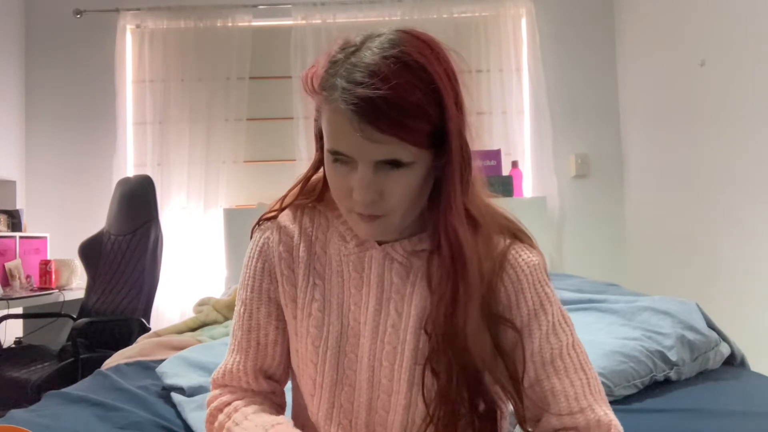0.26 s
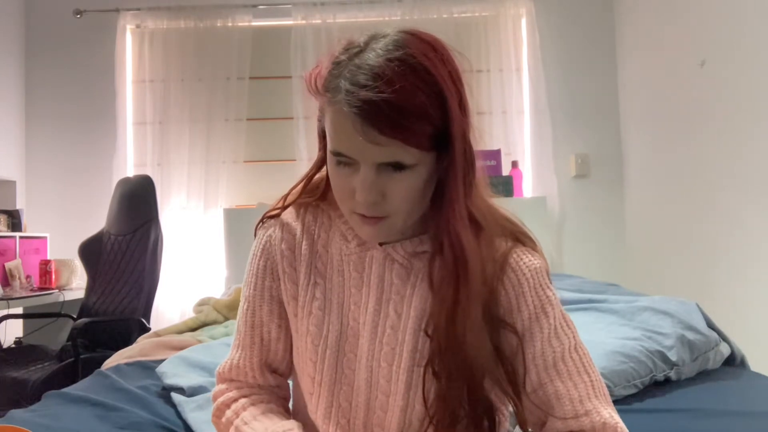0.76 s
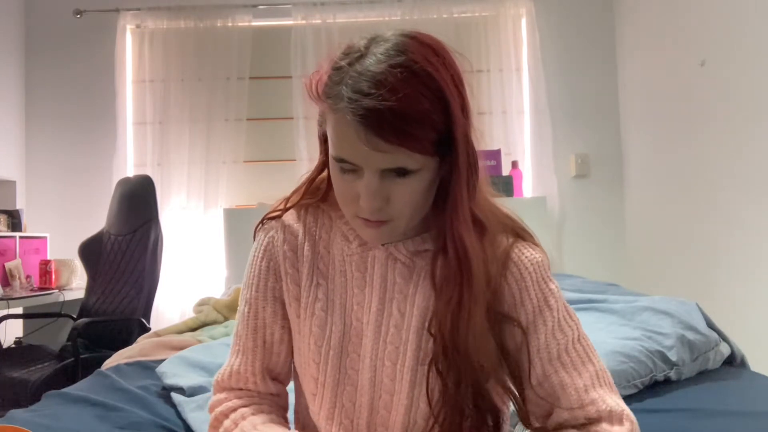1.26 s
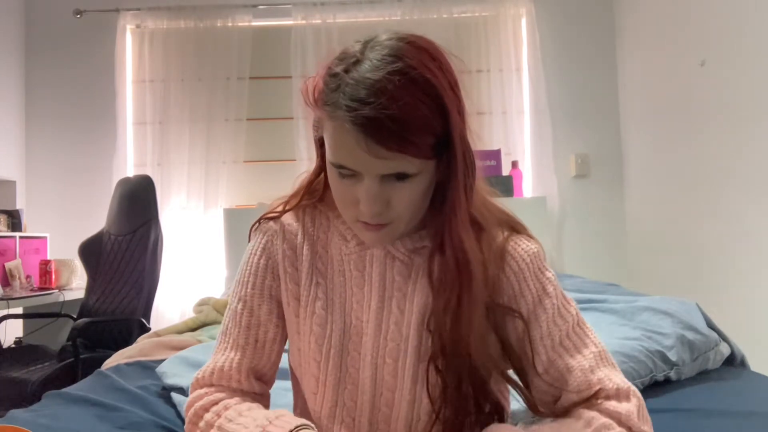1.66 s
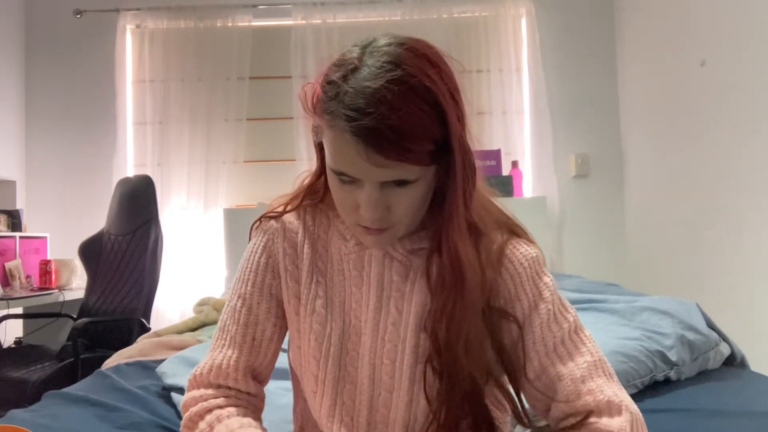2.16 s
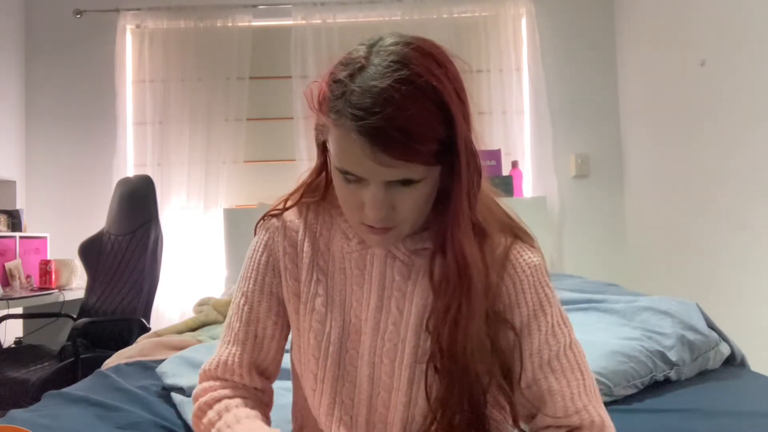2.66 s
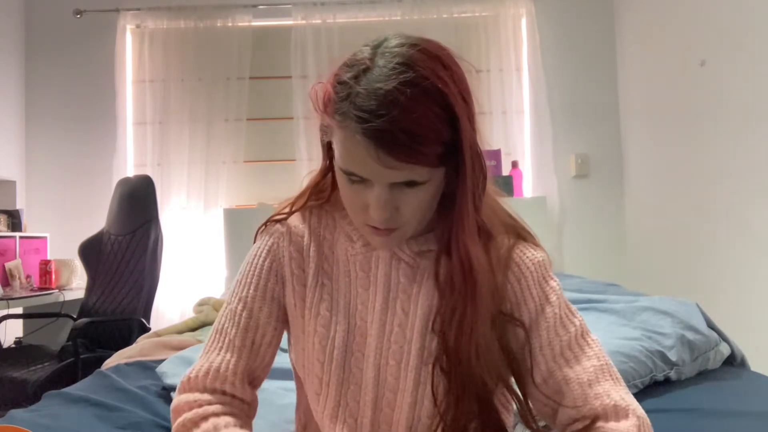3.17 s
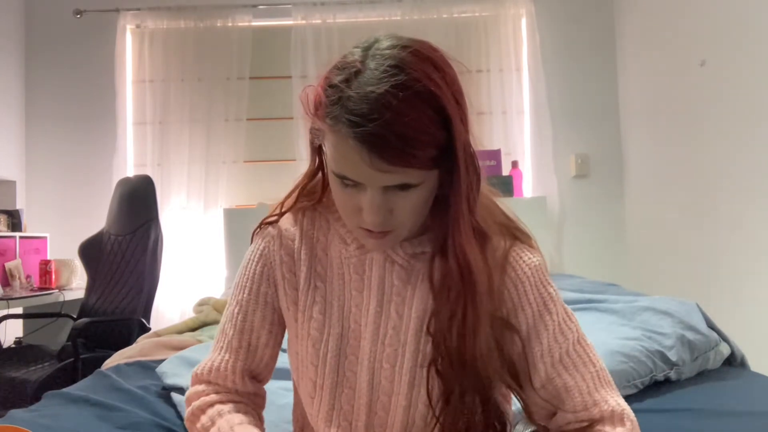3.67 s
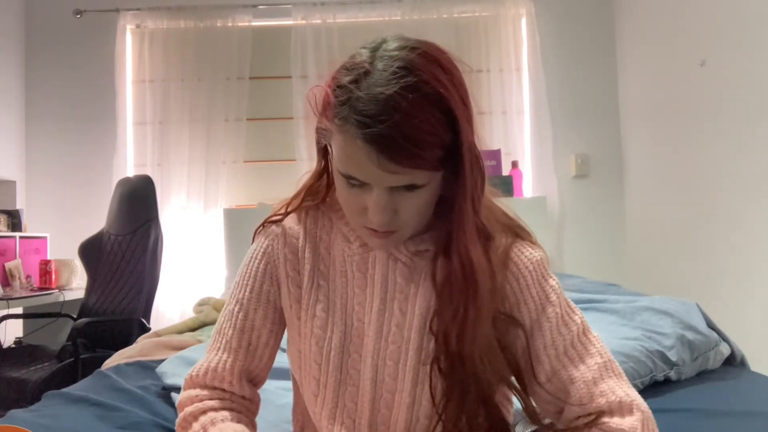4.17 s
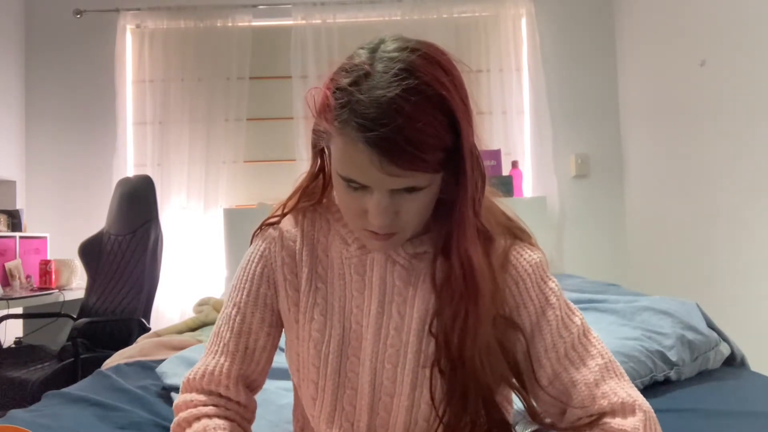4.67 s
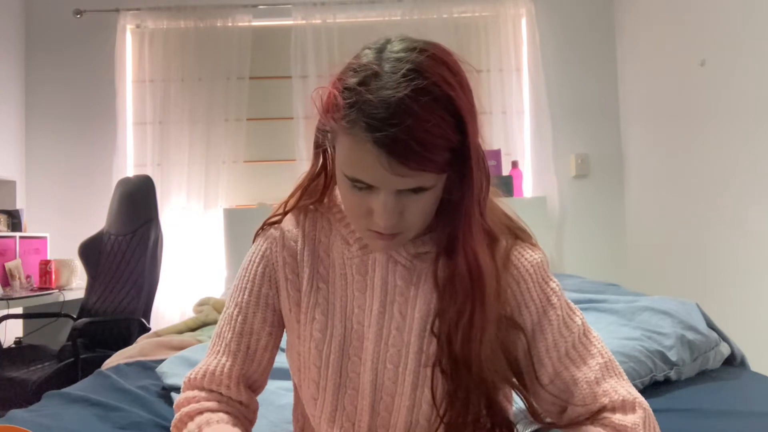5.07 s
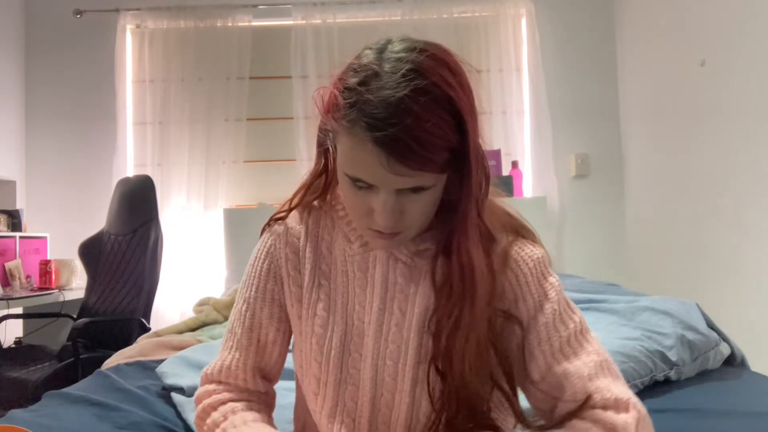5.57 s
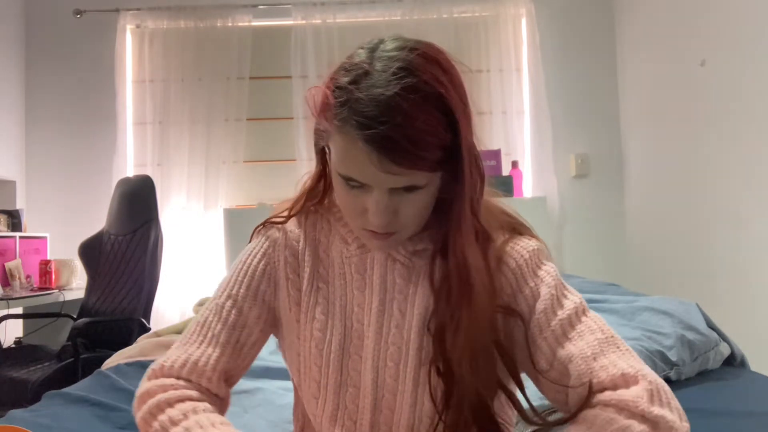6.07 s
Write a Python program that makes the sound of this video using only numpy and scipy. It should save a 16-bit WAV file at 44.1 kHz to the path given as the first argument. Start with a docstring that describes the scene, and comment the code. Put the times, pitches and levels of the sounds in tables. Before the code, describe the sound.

In a small bedroom, hands turn and open a stiff plastic sweet packet on a bed, close to the microphone. From 0 s there are scattered snaps and tiny crackles, with a sharper cluster around 0.4-0.6 s and a bright crack near 1.05 s. Separate creases continue until about 2 s, then thicken into the loudest dense burst at 2.28-2.5 s, with a low cushioned bump. It eases briefly; from 2.85 to 3.65 s crisp creases crowd together and taut film judders in rapid ticks. From 3.7 to 5 s the crinkling is lighter and uneven, with isolated snaps near 4.36 and 4.66 s. Dull bumps ring softly on the bed at 5.3 s, followed by sparse rustle. Around 6.1 s it intensifies, ending at 6.3 s in a strong flurry with a low thump. Fine film sliding, a short room tail and faint rumble run throughout.

```python
"""A small bedroom: hands turn and open a plastic sweet packet on a bed, just under a two-port microphone.
First come scattered snaps, each a crease that buckles, flaps the film and shakes the bag, over faint room rumble.
Past two seconds they bunch into a loud burst with a low bump; after three they crowd again, and the film judders.
Then they thin out, more bumps ring low on the bed after five seconds, and a strong flurry ends the take.
Throughout, tiny folds crackle and film slides at random; nearby surfaces and walls add a short tail."""
import sys
import numpy as np
from scipy import signal
from scipy.fft import rfft, irfft, next_fast_len
from scipy.io import wavfile

SR = 44100
rng = np.random.default_rng(int(sys.argv[2]) if len(sys.argv) > 2 else 0)


def wav_out(sig):
    """Save sig, one row per channel (or a flat mono array), as 16-bit PCM at SR to the path in sys.argv[1]."""
    wavfile.write(sys.argv[1], SR, np.round(np.clip(np.atleast_2d(sig).T, -1, 1) * 32767).astype(np.int16))


N = 279153
T = np.arange(N) / SR
BURST = 1536  # samples in one short film or bag sound
SIDES = np.array([[1], [-1]])  # left port, right port


def undb(db):
    """Decibels to gain."""
    return 10 ** (np.asarray(db) / 20)


def unit(x):
    """Scale each row to an energy of one."""
    return x / np.sqrt(np.sum(x ** 2, axis=-1, keepdims=True) + 1e-30)


def level(x, db):
    """Scale each row to an rms level."""
    return unit(x) * np.sqrt(x.shape[-1]) * undb(db)


def along(hz, points, axis=1):
    """Read one column of a table against log frequency."""
    table = np.array(points, float)
    return np.interp(np.log(hz + 1), np.log(table[:, 0]), table[:, axis])


def bins(size):
    """Frequencies of a spectrum of so many samples."""
    return np.fft.rfftfreq(size, 1 / SR)


def colour(x, points):
    """Causal (minimum-phase) filter with the given (Hz, dB) shape."""
    size = next_fast_len(2 * x.shape[-1])
    size += size % 2
    cepstrum = irfft(np.log(undb(along(bins(size), points))))
    # folding the cepstrum onto positive times makes the filter causal
    cepstrum[1:size // 2] *= 2
    cepstrum[size // 2 + 1:] = 0
    filtered = irfft(rfft(x, size) * np.exp(rfft(cepstrum)))
    return filtered[..., :x.shape[-1]]


def shudder(count, decay_s, rise_s=1e-6, size=BURST):
    """Bursts of irregular motion that build up and die away, one a row."""
    t = np.arange(size) / SR
    return rng.standard_normal((count, size)) * np.exp(-t / decay_s) * (1 - np.exp(-t / rise_s))


def resonate(x, hz, q):
    """Each row through its own broad resonance, applied twice for steep skirts."""
    ratio = (bins(x.shape[-1]) + 1) / hz[:, None]
    return irfft(rfft(x) / (1 + 1j * q * (ratio - 1 / ratio)) ** 2)


def place(times, sounds):
    """Lay the rows on the time line."""
    out = np.zeros(N + sounds.shape[1])
    starts = np.clip(times * SR, 0, N - 1).astype(int)
    for start, sound in zip(starts, sounds):
        out[start:start + len(sound)] += sound
    return out[:N]


# Spectral shape of the still air in the room. Each row: frequency in Hz, relative density in dB per Hz.
ROOM_AIR = [(25, -35.5), (40, 0), (55, 2.5), (120, -3.5), (300, -12.5), (1000, -28), (4000, -37),
            (15000, -33)]


def air():
    """Faint room rumble, nearly the same on both sides: shaped noise with a weak side part."""
    mid, side = colour(rng.standard_normal((2, N)), ROOM_AIR)
    return level(mid, db=-73.5) + SIDES * level(side, db=-82.5)


# The bedroom's tail by band. Each row: frequency in Hz, energy against the direct sound in dB,
# time to fall by 60 dB in s, side minus mid in dB.
ROOM_TAIL = [(286, -1.5, 0.37, -7), (420, 0.5, 0.26, -9), (690, 3, 0.3, 5.5), (1080, -4.5, 0.29, 0.5),
             (2810, -1.5, 0.29, 0), (6930, -5, 0.25, 2.5), (9570, -15.5, 0.33, -12.5),
             (11900, -15, 0.18, 18.5), (14000, -19.5, 0.29, -30)]


def bedroom(x, build_s=0.0045, size=22050):
    """A diffuse tail: noise in bands, each with its own fade and its own width between the ports."""
    t, hz = np.arange(size) / SR, bins(size)
    mid, side = rfft(rng.standard_normal((2, size)))
    width = undb(along(hz, ROOM_TAIL, axis=3))
    field = (mid + SIDES * width * side) / np.hypot(1, width)
    response = np.zeros((2, size))
    for own, (_, db, t60, _) in zip(np.eye(len(ROOM_TAIL)), ROOM_TAIL):
        # this band's share of the spectrum, crossfading into its neighbours
        share = along(hz, [(row[0], weight) for row, weight in zip(ROOM_TAIL, own)])
        build = 1 - np.exp(-(t / build_s) ** 2)
        fade = unit(build * np.exp(-np.log(1000) * t / t60))
        response += undb(db) * fade * irfft(field * share)
    return signal.fftconvolve(x[None], response, axes=1)[:, :N]


def turning(x, count=4):
    """Every crease faces its own way, so each draws another blend of the room's answers."""
    knots = np.arange(0, N / SR, .01)
    wander = [np.interp(T, knots, rng.standard_normal(len(knots))) for _ in range(count)]
    share = unit(np.array(wander).T).T  # the squared shares add up to one at every moment
    return sum(bedroom(x * part) for part in share)


# First reflections off nearby surfaces. Each row: delay in seconds, energy in dB.
NEAR_ECHOES = [(.0023, -16), (.0095, -17), (0.0098, -38)]


def reflections(x):
    """Nearby surfaces send back slightly scattered copies, different at each port."""
    response = np.zeros((2, 1024))
    for delay, db in NEAR_ECHOES:
        scatter = unit(shudder(2, decay_s=0.00037, size=128))
        start = int(delay * SR)
        response[:, start:start + scatter.shape[1]] += undb(db) * scatter
    return signal.fftconvolve(x[None], response, axes=1)[:, :N]


# Dull bumps of the packet and hands on the bed. Each row: start in seconds, ring in Hz,
# level in dB before the rise softens it, time to fall by 60 dB in s, rise in s.
BED_BUMPS = [(2.293, 129.4, -39.5, 0.15, 0.013), (5.278, 151, -53, 0.15, 0.0092),
             (5.295, 286, -47, 0.087, 0.01), (5.294, 61.3, -45.5, 0.95, 0.024), (5.3, 50, -56, 0.5, .015),
             (5.335, 92, -47, 0.15, .008), (5.355, 126, -54.5, 0.17, .006), (5.375, 184, -59, 0.15, .006),
             (6.255, 166, -53.5, 0.15, 0.0064), (6.258, 342, -36.5, 0.16, 0.0062),
             (6.284, 237, -55, 0.073, 0.0088)]


def bumps():
    """A cushioned push swells into a low ring, a fading sine."""
    out = np.zeros(N)
    for s, hz, db, t60, rise_s in BED_BUMPS:
        age = np.maximum(T - s, 0)
        swell = 1 - np.exp(-age / rise_s)
        out += undb(db - 60 * age / t60) * swell * np.sin(2 * np.pi * hz * age)
    return out


# Steady rustle of the film under the fingers, as pressure that drives the slide and crackle.
# Each row: time in seconds, low rustle in dB, high rustle in dB, both before the gains of those layers.
STEADY_RUSTLE = [(0.0, -72, -92), (0.3, -68.5, -83), (0.44, -80, -71), (0.86, -71, -76), (1.04, -62, -66),
                 (1.3, -60, -76.5), (1.74, -62.5, -75), (2.34, -59.5, -43), (2.63, -47.5, -48.5),
                 (2.84, -61.5, -96), (3.19, -52.5, -38.5), (3.45, -53, -43.5), (3.72, -49.5, -57),
                 (4.97, -65.5, -51), (5.24, -67, -47), (5.66, -58, -57), (6.12, -45.5, -36.5),
                 (6.33, -46.5, -69)]


def strained(steady_db, snap_db, build_s=0.009, settle_s=0.046):
    """Film is strained around every snap: the steady rustle in dB plus a swell as strong as the snap."""
    knots = np.arange(0, N / SR, .002)
    age = knots[:, None] - np.array(CREASES)[:, 0]  # negative before the snap
    swell = np.exp(np.minimum(age / build_s, -age / settle_s)) * undb(snap_db)
    steady = undb(np.interp(knots, np.array(STEADY_RUSTLE)[:, 0], steady_db))
    power = steady ** 2 + np.sum(swell ** 2, axis=1)
    return np.interp(T, knots, 10 * np.log10(power))


# Spectral shape of film sliding on film and skin. Each row: frequency in Hz, relative level in dB.
SLIDE_SHAPE = [(100, -17.5), (200, -13.5), (480, -0.5), (720, 0), (1200, -4), (2800, -2.5), (6000, -8),
               (14000, -23.5)]


def slide(low_db, grain_db=8, gain_db=-12):
    """Film rubs on film in small catches and slips: noise whose level jumps 300 times a second."""
    hold = SR // 300
    steps = np.clip(rng.standard_normal(N // hold + 1), -2, 2)
    catches = np.repeat(steps, hold)[:N]
    rub = rng.standard_normal(N) * undb(grain_db * catches)
    return level(colour(rub, SLIDE_SHAPE), gain_db) * undb(low_db)


def swing(hz, cycles, glide=0.57, size=BURST):
    """A flipped panel swings briefly, its pitch falling as it relaxes; one a row."""
    age = np.arange(size) / SR * hz[:, None] / cycles
    turns = cycles * (0.82 * age + 2 * glide * (1 - np.exp(-age / 2)))
    return age * np.exp(-age) * np.sin(2 * np.pi * (turns + rng.random((len(hz), 1))))


def ring(hz, cycles, overtone=1.433, overtone_db=-9, size=BURST):
    """Two modes of a panel ring out, the upper one different for every shape; one a row."""
    turns = np.arange(size) / SR * hz[:, None]
    chance = rng.random((len(hz), 3, 1))
    upper = overtone * (0.853 + 0.34 * chance[:, 0])
    low_mode = np.sin(2 * np.pi * (turns + chance[:, 1]))
    high_mode = np.sin(2 * np.pi * (upper * turns + chance[:, 2]))
    modes = low_mode + undb(overtone_db) * high_mode
    return modes * (1 - np.exp(-(turns / cycles) ** 2)) * np.exp(-turns / cycles)


def disperse(x, shortest_s=0.00003, longest_s=0.00045):
    """Bending waves carry low notes more slowly: each row crosses its own film as a tiny falling chirp."""
    travel_s = rng.uniform(shortest_s, longest_s, (len(x), 1))  # delay at 1 kHz
    phase = 4 * np.pi * travel_s * np.sqrt(1000 * bins(x.shape[-1]))
    return irfft(rfft(x) * np.exp(-1j * phase))


# Spectral shape of a crease's tick, before its own tilt. Each row: frequency in Hz, relative level in dB.
TICK_SHAPE = [(2500, -39), (5200, -7), (6600, -9), (8500, 0), (10000, 1.5), (11500, -2), (13500, -5),
              (16000, -25)]


def buckle(tick_db, tilt_db, panel_hz, panel_db, tick_s, panel_s, q, swing_cycles=0.52,
           flutter_db=-9, ring_pitch=0.95, ring_cycles=1.68, ring_db=-7):
    """A crease flips with a bright tick; the panel beside it swings, flutters and rings on, a little lower."""
    count = len(tick_db)
    octaves = np.log2(np.maximum(bins(BURST), 4000))  # the tilt acts above 4 kHz
    raw_tick = colour(shudder(count, tick_s, rise_s=0.000096), TICK_SHAPE)
    tick = irfft(rfft(raw_tick) * undb(tilt_db[:, None] * octaves))
    flutter_s = panel_s * np.sqrt(2000 / panel_hz)[:, None]  # low panels flutter longer
    flutter = resonate(shudder(count, flutter_s, rise_s=0.00044), panel_hz, q)
    flap = resonate(swing(panel_hz, swing_cycles * q), panel_hz, q=0.29)
    after = ring(ring_pitch * panel_hz, ring_cycles * q)
    # a higher q makes the ring both longer and stronger
    panel = unit(flap) + undb(flutter_db) * unit(flutter) + undb(ring_db) * q * unit(after)
    return unit(tick) * undb(tick_db)[:, None] + unit(disperse(panel)) * undb(panel_db)[:, None]


def crackle(low_db, high_db, spread_db=7, tick_gain_db=10, panel_gain_db=13,
            idle_db=-70, busy_db=-48, count=1200):
    """Tiny folds give way at random, each with its own pitch and ring, louder and more often under pressure."""
    chance = rng.random((count, 4))  # time, pitch, whether it gives, ring
    spread = np.clip(rng.standard_normal((count, 3)), -2, 1.2)  # size, tick level, tilt
    s = chance[:, 0] * N / SR
    likelihood = np.interp(np.interp(s, T, low_db), [idle_db, busy_db], [.1, 1])
    gives = chance[:, 2] < likelihood
    s, chance, spread = s[gives], chance[gives], spread[gives]
    panel_hz = 900 * 4.28 ** chance[:, 1]
    size_db = spread_db * spread[:, 0]
    tick_db = np.interp(s, T, high_db) + size_db + 2 * spread[:, 1] + tick_gain_db
    panel_db = np.interp(s, T, low_db) + size_db + panel_gain_db
    folds = buckle(tick_db, 4 * spread[:, 2], panel_hz, panel_db,
                   tick_s=0.00038, panel_s=0.00031, q=0.75 + 1.3 * chance[:, 3:])
    return place(s, folds)


# Runs of tiny ticks as the film judders through the fingers. Each row: start in seconds, length in s,
# ticks per s, middle tick energy in dB, middle panel energy in dB.
JUDDER_RUNS = [(3.2, 0.11, 127, -23, -22.5), (3.339, 0.1, 250, -21.5, -31), (3.602, .05, 140, -28, -20),
               (4.664, .05, 220, -25.5, -27), (6.028, .13, 110, -32, -33)]


def judder(jitter=.35, spread_db=5, tilt_db=-3, panel_hz=2100, count=40):
    """Taut film catches and lets go in quick, uneven succession."""
    out = np.zeros(N)
    for start, length, rate, tick_db, panel_db in JUDDER_RUNS:
        wait, size, pitch = rng.uniform(-1, 1, (count, 3)).T
        age = (np.arange(count) + jitter * wait) / rate
        ticks = buckle(tick_db + spread_db * size, np.full(count, tilt_db), panel_hz * np.exp(pitch / 2),
                       panel_db + spread_db * size, tick_s=0.0002, panel_s=0.00044, q=0.56)
        within = age < length
        out += place(start + age[within], ticks[within])
    return out


def avalanche(lead_s=0.0014, trail_s=.009, lead_db=-3, tick_drop_db=-20, panel_drop_db=-14,
              tilt_rise_db=9.0, count=6):
    """One small slip announces each loud crease, which sets off five neighbours in the next milliseconds."""
    s, tick_db, tilt_db, panel_hz, panel_db, _ = np.repeat(np.array(CREASES), count, axis=0).T
    wait, size, pitch = rng.uniform(-1, 1, (len(s), 3)).T
    first = np.arange(len(s)) % count == 0
    times = s + np.where(first, -lead_s, trail_s) * (1 + .8 * wait)
    size_db = 4 * size + lead_db * first
    folds = buckle(tick_db + tick_drop_db + size_db, tilt_db + tilt_rise_db,
                   panel_hz * np.exp(.6 * pitch - .15), panel_db + panel_drop_db + size_db,
                   tick_s=0.00026, panel_s=0.00037, q=0.89)
    return place(times, folds)


# Spectral shape of the whole bag being shaken. Each row: frequency in Hz, relative level in dB.
BAG_SHAPE = [(50, -26.5), (110, -33), (180, -9), (290, -4.5), (400, -3), (530, 2.5), (720, -3.5),
             (1100, 6.5), (3000, -53.5)]
# The hollow of the bag changes with the grip. Each row: time in seconds, resonance in Hz before scatter.
BAG_HOLLOW = [(0.0, 450.6), (0.65, 475.6), (1.15, 440), (1.45, 503), (2.1, 484), (2.35, 420), (3.25, 403),
              (3.55, 444), (4.2, 370), (4.9, 480), (5.65, 442), (6.33, 390)]
# Creases that buckle. Each row: start in seconds, tick energy in dB, tick brightness in dB per octave,
# film panel resonance in Hz, panel energy in dB, bag body energy in dB; energies before the layer gains.
CREASES = [(0.028, -36.5, 1.5, 2174, -21.5, -46), (0.1563, -61, -2.5, 2670, -43.5, -63.5),
           (0.1813, -58, -5, 1605, -38, -52), (0.2462, -25, -10, 2560, -17, -39),
           (0.2594, -44, -10, 2120, -25, -58), (0.305, -45, -17, 2394, -20, -39),
           (0.3872, -47.5, -8, 1080, -35.5, -31.5), (0.4196, -19, -2.5, 2460, -16, -46),
           (0.42, -20, -5.5, 2245, -9.5, -46.5), (0.4469, -25, -6, 3180, -19, -36),
           (0.4514, -2.5, 1, 2600, -10, -33.5), (0.4619, -27, -5, 2020, -19.5, -39.5),
           (0.494, -6.5, -4.5, 3240, -16.5, -44.5), (0.5244, -22, -8, 2540, -18.5, -47),
           (0.5368, -11, -6, 2540, -10.5, -26.5), (0.547, -14.5, -15, 3130, -17, -35),
           (0.5535, -19, 0, 2240, -18, -40), (0.643, -24.5, -13, 2000, -18.5, -26.5),
           (0.7228, -44.5, -3, 2130, -41.5, -45.5), (0.832, -42, -14.5, 1950, -26.5, -38),
           (0.8436, -17, -6.5, 2230, -34, -40), (0.8605, -28, -1.5, 2260, -23.5, -36),
           (0.8721, -34, -11.5, 1850, -25.5, -27), (0.8766, -17.5, -11, 3060, -13, -31.5),
           (0.9385, -25.5, -10.5, 2330, -30, -30.5), (0.966, -29.5, -4, 3400, -33.5, -44),
           (0.9882, -42, -15, 2110, -26, -32), (1.0046, -34, -25, 1570, -27.5, -30),
           (1.0462, 2, 7, 2680, -10.5, -25.5), (1.1452, -29, -22, 1740, -24, -25.5),
           (1.2234, -22.5, 2.5, 3210, -37.5, -54.5), (1.2668, -12, -0.5, 2887, -17, -34),
           (1.3358, -55, -4.5, 2200, -34, -46.5), (1.416, -12, 6, 2500, -15.5, -24.5),
           (1.5, -21, -7, 3420, -18, -32.5), (1.5922, -35, -1.5, 1740, -28.5, -34.5),
           (1.6751, -32, -1.5, 1537, -32, -34), (1.711, -26, -14.5, 3010, -19, -31.5),
           (1.7162, -35, -3, 2460, -20.5, -29), (1.8066, -42, 0, 1450, -31.5, -32),
           (1.832, -23, -10, 1750, -19.5, -31), (1.8617, -28.5, -2, 3640, -33.5, -43.5),
           (1.881, -33, 0, 3580, -31, -45.5), (1.897, -8.5, 1, 3560, -15.5, -27),
           (1.9249, -38.5, -16, 2060, -18, -32.5), (1.9329, -27.5, -10, 2430, -17.5, -35),
           (1.9655, -41, -16.5, 1870, -30, -41), (2.015, -9, -1.5, 2760, -14.5, -41),
           (2.043, -34, 2.5, 2870, -38.5, -49), (2.055, -22.5, 6, 2873, -24, -30),
           (2.0776, -39.5, 0, 1810, -31.5, -35.5), (2.109, -18.5, -4.5, 2390, -13.5, -53),
           (2.1569, -23, -3, 2243, -13, -31), (2.167, -11, -4, 2810, -26.5, -40),
           (2.1942, -32.5, -10.5, 3580, -30, -40.5), (2.203, -9, -5, 2320, -16, -29),
           (2.233, -14, 2.5, 3500, -33, -57), (2.256, -7.5, 1, 4260, -16, -49),
           (2.2735, -10, -6, 2460, -10.5, -25), (2.2841, -2, -3, 2120, -3.5, -18.5),
           (2.286, 4.5, -6, 2770, 0, -37), (2.288, 5.5, -5.5, 3300, -9, -29),
           (2.2947, -8, 5, 2090, -4.5, -26), (2.3017, -0.5, 8, 2820, -3, -19),
           (2.3037, -14, 1, 2700, -6.5, -19), (2.3061, -11, 4, 2100, -15, -29),
           (2.31, -20, 1, 1160, -11.5, -18.5), (2.3164, -14, 4, 3200, -18, -31),
           (2.328, -15, 0, 2300, -15, -33), (2.3651, -22.5, -10.5, 2300, -12.5, -23.5),
           (2.3712, -7, -8, 2100, -9, -28), (2.3774, -16, -0.5, 2600, -16, -28),
           (2.384, -26.5, -5, 1700, -24, -27.5), (2.3974, -10.5, 3, 2630, -14.5, -26),
           (2.4073, -12, -12, 2400, -13.5, -28), (2.4167, -12, -13, 2890, -12, -21),
           (2.4267, -20.5, -8, 3450, -15, -28), (2.4717, -27, -11, 2540, -20.5, -35),
           (2.4806, -23, -14, 2690, -30, -30.5), (2.4878, -8.5, -3, 1900, -6.5, -27),
           (2.5085, -10.5, -5, 2770, -14, -25.5), (2.6105, -24.5, -13, 2186, -16, -29.5),
           (2.7316, -20.5, -1.5, 2340, -29, -37), (2.7345, -18.5, 7, 2510, -20.5, -30),
           (2.786, -28, -4.5, 2485, -21.5, -43), (2.7926, -22.5, -5, 1590, -23, -44),
           (2.845, -14, -3, 1360, -11, -22), (2.847, -17.5, 8, 2626, -13.5, -31.5),
           (2.882, -28, 6, 2790, -27.5, -41.5), (2.934, -21, -2.5, 2130, -22, -37.5),
           (2.972, -19, 13, 3270, -10, -32), (2.9899, -13, 3, 2793, -14, -22),
           (3.0017, -13, 3, 1470, -12, -23), (3.0224, -11.5, 4.5, 2370, -9, -41),
           (3.0544, -9.5, 0.5, 2560, -11.5, -38), (3.0889, -15, 3, 1540, -14.5, -31.5),
           (3.1157, -15, -8, 2600, -16.5, -33), (3.14, -28.5, 2, 1403, -25, -33),
           (3.1795, -12, 10, 1300, -4.5, -39.5), (3.1916, -10, -23, 2270, -15.5, -43),
           (3.2068, -20, 10, 2190, -13, -39), (3.2218, -23, 4, 2090, -19.5, -28),
           (3.2249, -12, 15, 2110, -8.5, -21), (3.2263, -15, 11, 1400, -5.5, -15),
           (3.2445, -12.5, -16.5, 2820, -20, -23), (3.2546, -31, 0, 2020, -13.5, -28),
           (3.2592, -9, 17, 1890, -17, -41), (3.3071, -13.5, 5.5, 3440, -13, -35.5),
           (3.311, -15, 7, 1915, -8, -43.5), (3.319, -4, 5, 3140, -18, -43),
           (3.3346, -7.5, -3, 2680, -7, -45), (3.3756, -20, -4.5, 2450, -23.5, -38.5),
           (3.4047, -16, -4, 2930, -25, -37.5), (3.4138, -12.5, 12, 2250, -12, -21),
           (3.469, -10.5, 9.5, 2400, -11.5, -27), (3.485, -22, -2, 2390, -14, -43),
           (3.512, -7.5, 6.5, 1880, -10, -32.5), (3.5386, -8, 3, 2500, -10, -21.5),
           (3.5638, -25, -2.5, 2150, -28.5, -25.5), (3.5682, -15.5, -2, 1830, -8, -34),
           (3.582, -10, -2.5, 1623, -5.5, -31), (3.5946, -8.5, -2.5, 2310, -18, -17.5),
           (3.6098, -15, 2, 1560, -10, -24), (3.6181, 1, -1.5, 2700, -6, -16.5),
           (3.651, -23, -15, 1830, -20.5, -30), (3.6551, -14.5, -13.5, 3570, -23, -34),
           (3.7232, -46, -1.5, 1480, -30.5, -46.5), (3.756, -28, 5, 2770, -36.5, -50),
           (3.781, -27, 7, 2960, -42, -52.5), (3.7944, -20, 6, 2250, -26, -30),
           (3.8016, -16, 7, 2924, -24, -30), (3.8252, -19, -13, 1840, -19, -29.5),
           (3.838, -20.5, -9, 1740, -24.5, -23.5), (3.866, -18, 2.5, 2920, -17.5, -35.5),
           (3.8815, -20, -12, 1360, -13, -22), (3.9321, -21, -12, 1594, -15.5, -31.5),
           (3.9737, -19, 4, 2480, -18.5, -39), (3.9837, -18.5, 0.5, 1440, -13.5, -39),
           (4.0093, -28, -17, 2050, -20, -45), (4.0299, -25.5, -7, 1410, -29, -34),
           (4.08, -20.5, -2, 1780, -21.5, -33.5), (4.1087, -21, -7, 1871, -15.5, -29.5),
           (4.1568, -14.5, -5, 2548, -27.5, -26.5), (4.1698, -8, 10.5, 2260, -13.5, -24),
           (4.1788, -13.5, -10, 1840, -16, -28), (4.2172, -22, -10.5, 2080, -15.5, -25),
           (4.2518, -25, -8, 2360, -22, -40), (4.2544, -21, -2.5, 2780, -20, -30.5),
           (4.2785, -15.5, 5.5, 1850, -21.5, -28), (4.287, -32, -9, 1590, -18.5, -37),
           (4.291, -20, -9, 1820, -23.5, -33), (4.3595, -6, -2.5, 3000, -13.5, -24.5),
           (4.4739, -33, -9.5, 2220, -28.5, -33), (4.4827, -33.5, -7.5, 1560, -23.5, -37.5),
           (4.4932, -10.5, 2.5, 2880, -22, -53.5), (4.534, -43, -1, 2680, -30, -57.5),
           (4.5628, -32, -14, 2610, -29, -54), (4.5678, -25, 3, 3050, -24, -45),
           (4.608, -19, -9, 2560, -19.5, -52), (4.66, -6, 4, 2410, -4.5, -22.5),
           (4.6765, -25.5, -3.5, 2450, -23, -31.5), (4.6848, -12, 2, 2250, -30.5, -44),
           (4.735, -21, 3.5, 3620, -21.5, -48.5), (4.7841, -29.5, -3.5, 2898, -27, -58.5),
           (4.8, -27.5, 3, 1400, -18, -39.5), (4.825, -27.5, -1.5, 3180, -16.5, -50),
           (4.899, -34, -13, 1440, -23, -30), (4.9062, -28.5, 4.5, 2340, -28, -41),
           (4.9807, -10.5, -0.5, 2340, -22.5, -46.5), (4.9886, -26, 3, 2270, -13.5, -49),
           (5.003, -15.5, 1, 2300, -26.5, -56), (5.029, -11, 11, 3070, -32, -51),
           (5.0375, -15, -4, 2600, -29.5, -50), (5.0735, -16, -11, 3230, -14.5, -33),
           (5.1522, -31.5, 2, 3550, -22.5, -57.5), (5.1958, -24, -3, 2180, -36, -57),
           (5.2382, -28, -11, 1280, -19.5, -44), (5.2419, -15.5, -17, 3100, -15.5, -34),
           (5.288, -19.5, -17, 2466, -17.5, -23.5), (5.3042, -15.5, 1.5, 2700, -13.5, -20.5),
           (5.3124, -15, 1, 2840, -23, -38), (5.3244, -25.5, -5, 2550, -17, -36),
           (5.3786, -15.5, -3, 2100, -14.5, -42.5), (5.4167, -22, 2, 2100, -16.5, -42),
           (5.4697, -24.5, -1, 1600, -26.5, -37.5), (5.4814, -30, -6.5, 1841, -26.5, -41.5),
           (5.569, -36, -2, 3192, -20.5, -58), (5.5906, -36.5, -3, 2450, -22, -37),
           (5.607, -30, -1, 2350, -19, -31), (5.612, -25, -1.5, 1920, -23, -36.5),
           (5.6229, -26.5, -19.5, 1860, -12.5, -27.5), (5.6908, -35.5, -0.5, 2020, -29.5, -37.5),
           (5.6992, -29.5, -13.5, 1170, -23, -30), (5.707, -21.5, -2, 2320, -23, -28),
           (5.7633, -29, -22, 2180, -24, -28.5), (5.796, -43, -9, 1960, -28.5, -36),
           (5.8111, -22.5, -15, 2000, -15.5, -24), (5.8294, -20, -4, 2520, -21, -41),
           (5.8341, -35, 2, 1370, -25, -42), (5.857, -14.5, -24, 2290, -16.5, -44),
           (5.8612, -21.5, 2, 1800, -23.5, -34), (5.9233, -22, -5, 3650, -32, -49),
           (5.9435, -23, -7, 3560, -21, -50), (5.9608, -16, 2, 2030, -13, -29),
           (5.9693, -14, -1, 3160, -15, -39), (5.9748, -18, 2, 1170, -14.5, -30),
           (5.9782, -15, -0.5, 3080, -16.5, -46), (6.011, -31, -7.5, 3520, -20, -46),
           (6.0526, -21.5, 5, 3160, -23, -38.5), (6.0622, -23, -3, 1803, -23.5, -37),
           (6.067, -17, -15, 2850, -24.5, -33), (6.089, -23, -4, 1960, -21.5, -23),
           (6.1085, -14, -10, 2110, -12, -27), (6.1243, -16.5, 3, 1770, -16, -20.5),
           (6.1351, -5.5, -4, 2240, -7.5, -23), (6.189, -28, -5, 2040, -18.5, -33),
           (6.195, -32, -6, 2084, -20, -32.5), (6.2268, -16, -7, 2070, -20, -43),
           (6.232, -29, -8, 2090, -23, -41), (6.259, -13, -1, 2560, -13.5, -21.5),
           (6.261, -9, -1.5, 2340, -10.5, -13), (6.2832, -5, 0.5, 1900, -9, -11),
           (6.2958, -10.5, 0, 1915, -6, -21)]


def snaps(panel_gain_db=-0.28, bag_gain_db=2.4, pop_q=0.67, hollow_scatter=0.18):
    """The loud creases: sharp ones crack broadly, dull ones pop with a pitch; each knocks on the bag's hollow."""
    s, tick_db, tilt_db, panel_hz, panel_db, bag_db = np.transpose(CREASES)
    # a panel that outweighs its tick rings with a clearer pitch
    q = pop_q * (2000 / panel_hz) ** 0.074 * undb(0.4 * (panel_db - tick_db))
    q = np.clip(q, .65, 1.8)
    film = buckle(tick_db, tilt_db, panel_hz, panel_db + panel_gain_db,
                  tick_s=0.00044, panel_s=0.0009, q=q[:, None])
    scatter = np.exp(hollow_scatter * rng.uniform(-1.1, 1, len(s)))
    hollow_hz = np.interp(s, *np.transpose(BAG_HOLLOW)) * scatter
    shake = colour(shudder(len(s), decay_s=0.002, rise_s=0.001), BAG_SHAPE)
    hollow = resonate(shake, hollow_hz, q=0.78)
    body = unit(unit(hollow) + undb(-3.5) * unit(shake))
    bag = body * undb(bag_db + bag_gain_db)[:, None]
    return place(s, film + bag)


# Phase by which sound from the hands leads at the left port. Each row: frequency in Hz, lead in radians.
LEFT_LEAD = [(100, 0), (1200, -.3), (4000, -.7), (5700, -2.35), (6800, -2.1), (8500, 0), (11200, 3.1),
             (14000, 6.2), (16000, 8.6)]


def ports(x, pan_db=-0.6):
    """The direct sound reaches the two microphone ports out of step, the left a touch weaker."""
    phase = np.interp(bins(2 * N), *np.transpose(LEFT_LEAD))
    halves = SIDES / 2
    return irfft(rfft(x, 2 * N) * np.exp(1j * halves * phase))[:, :N] * undb(halves * pan_db)


def scene(strain_low_db=-33, strain_high_db=-34):
    """The packet heard directly and off the walls; strain is set against each snap's panel and tick energy."""
    _, steady_low_db, steady_high_db = np.transpose(STEADY_RUSTLE)
    _, tick_db, _, _, panel_db, _ = np.transpose(CREASES)
    low_db = strained(steady_low_db, panel_db + strain_low_db)
    high_db = strained(steady_high_db, tick_db + strain_high_db)
    packet = snaps() + avalanche() + judder() + crackle(low_db, high_db) + slide(low_db)
    return ports(packet) + reflections(packet) + turning(packet) + bumps() + air()


# Colour of the microphone in its housing. Each row: frequency in Hz, gain in dB.
MIC_COLOUR = [(520, 1), (700, -3), (900, -0.5), (1200, 0.5), (1600, -3), (2200, -1), (3200, -1),
              (4100, 0.5), (5200, 2), (6500, 2), (9500, 4), (13000, 0.5)]


def record(dry, ceiling=0.66, top_hz=16600):
    """The microphone colours the sound; the recorder rounds the highest peaks and cuts the top."""
    heard = colour(dry, MIC_COLOUR)
    rounded = heard / (1 + (heard / ceiling) ** 4) ** .25
    low_pass = signal.ellip(10, .2, 90, top_hz, fs=SR, output="sos")
    return signal.sosfilt(low_pass, rounded)


dry = scene()
out = record(dry)
wav_out(out)
```